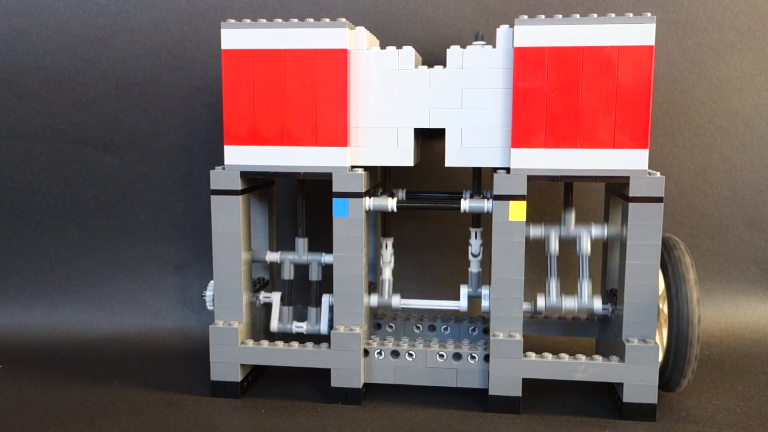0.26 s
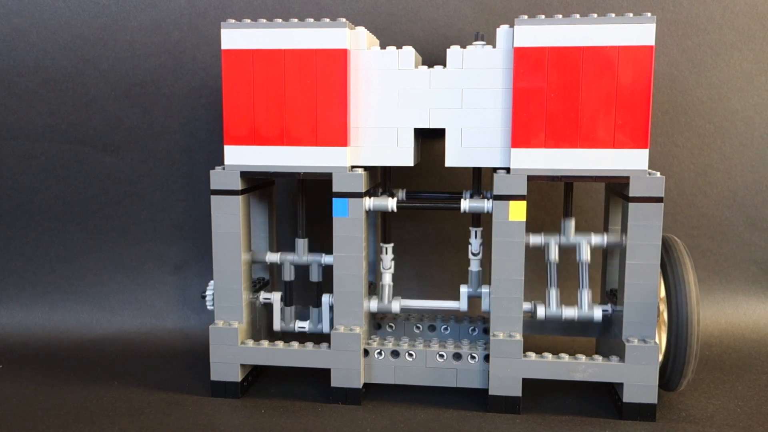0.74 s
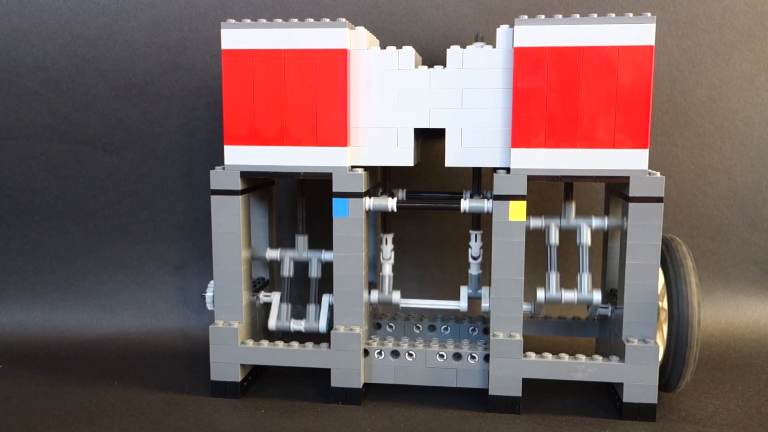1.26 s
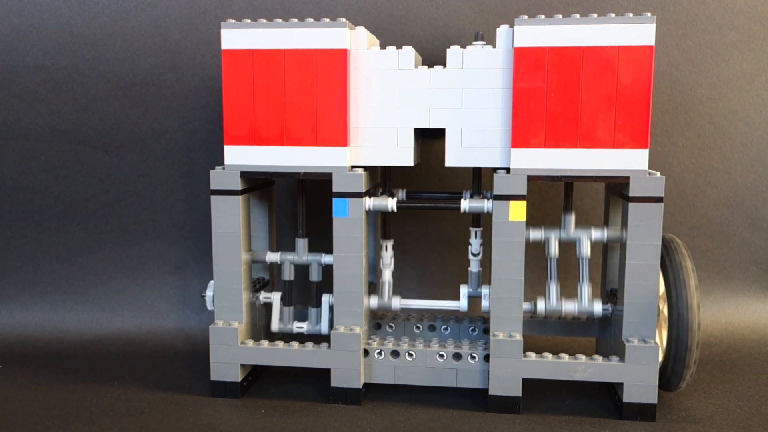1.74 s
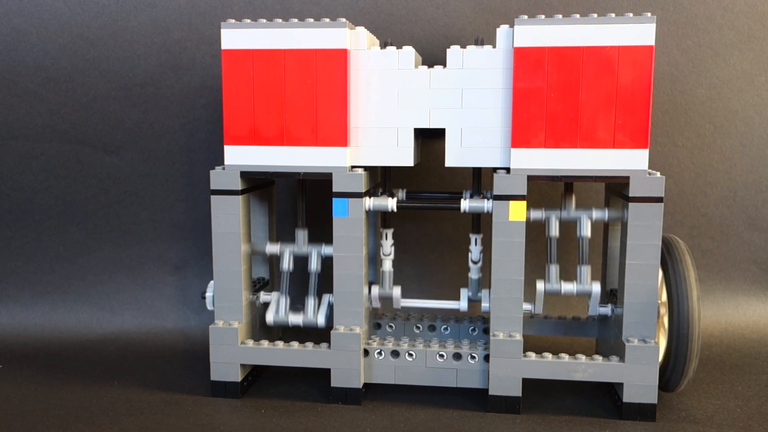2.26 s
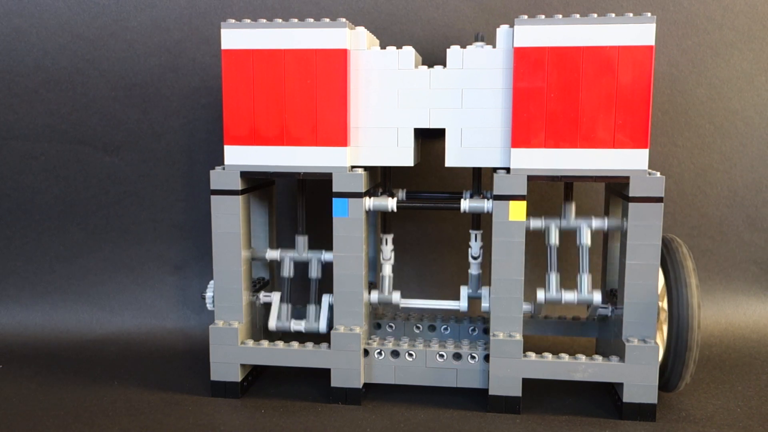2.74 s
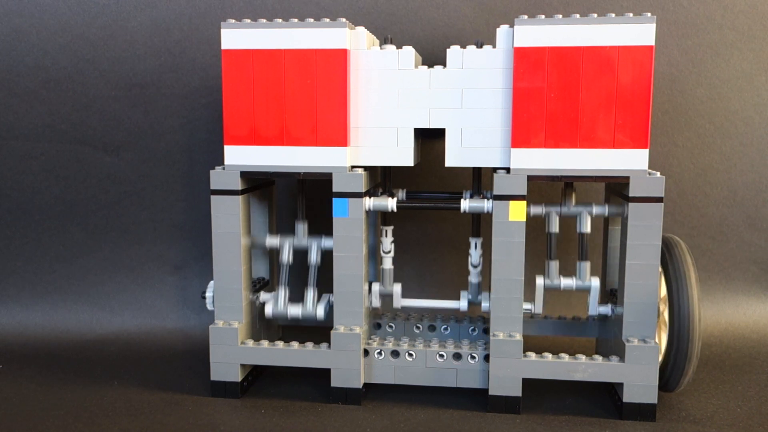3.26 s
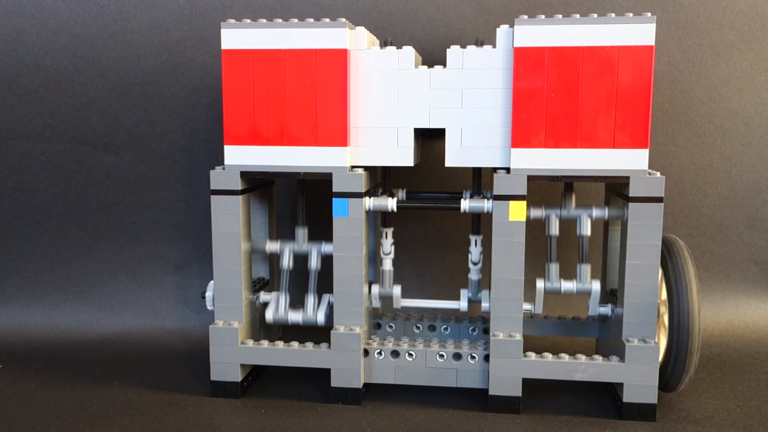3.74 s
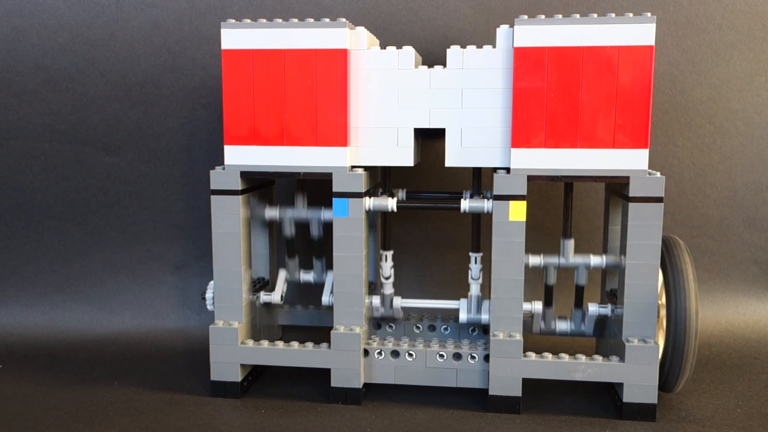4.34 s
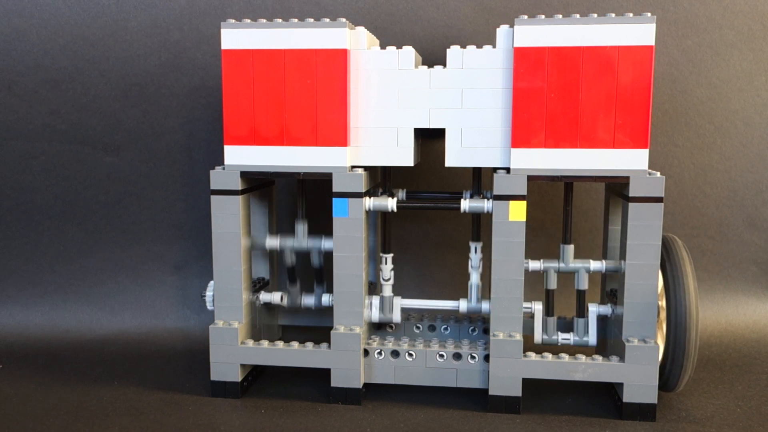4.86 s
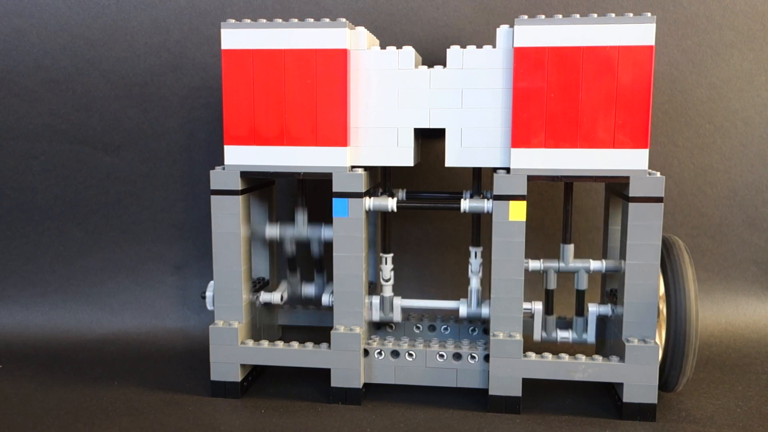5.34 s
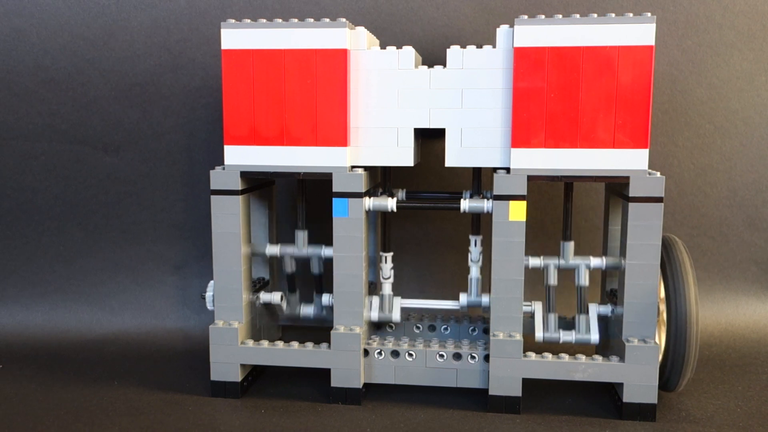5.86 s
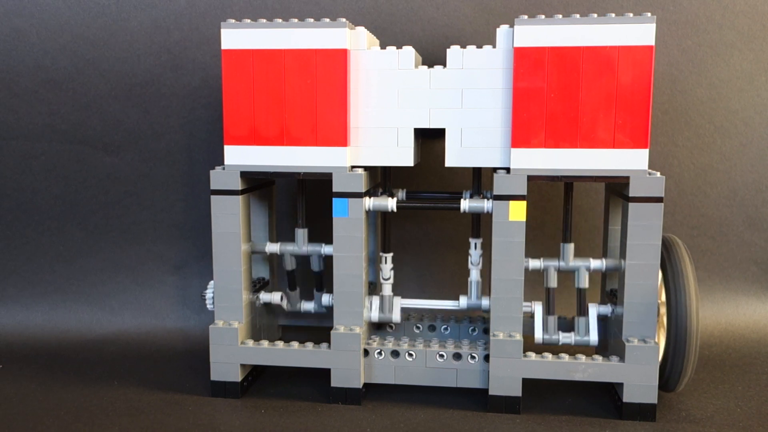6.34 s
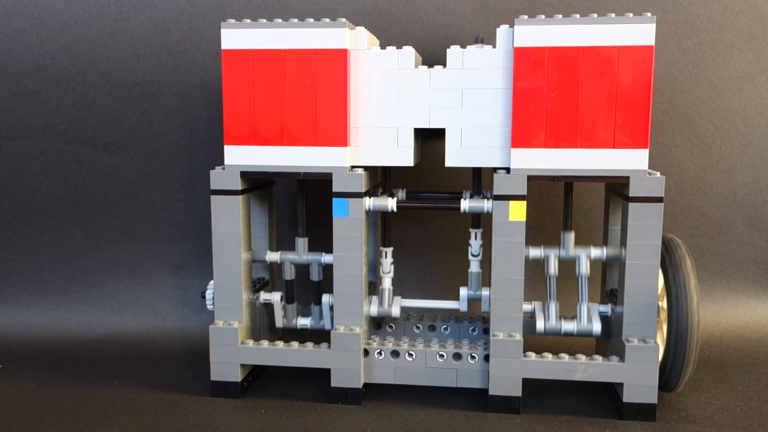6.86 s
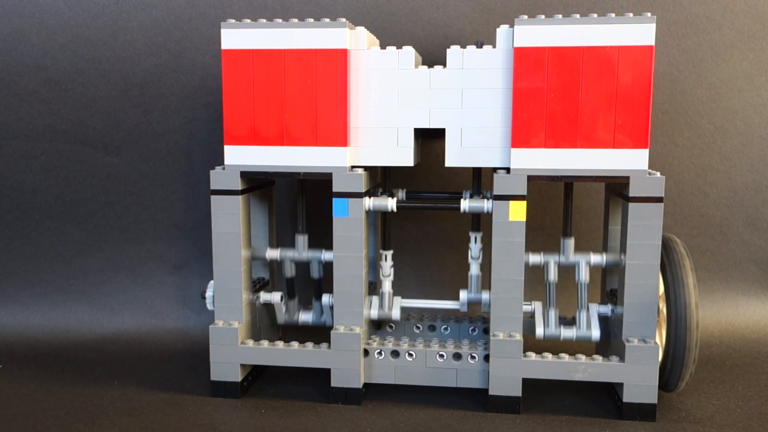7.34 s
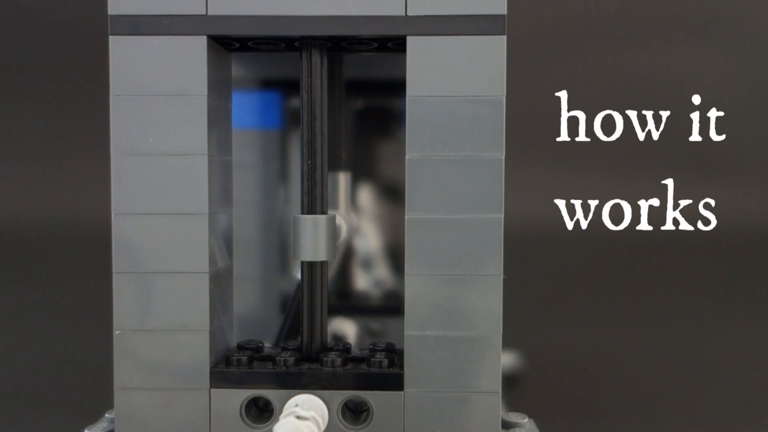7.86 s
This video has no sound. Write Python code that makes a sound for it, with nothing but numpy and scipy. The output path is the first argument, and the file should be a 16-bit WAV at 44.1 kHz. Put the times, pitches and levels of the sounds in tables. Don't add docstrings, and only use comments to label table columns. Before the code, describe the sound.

Close stereo sound of a plastic brick engine in a quiet, dry room: continuous rushing air with a thin whistle near five kilohertz, breathing in quick even pulses. Light hollow plastic knocks, sharp clicks and short rising squeaks repeat every quarter second. The whole machine fades out late, a brief hush follows, and at the very end barely audible scraping and tiny ticks come from slowly turned axles.

```python
import sys
import numpy as np
from scipy import signal
from scipy.fft import rfft, irfft, next_fast_len
from scipy.io import wavfile
from scipy.ndimage import uniform_filter1d

SR = 44100
rng = np.random.default_rng(int(sys.argv[2]) if len(sys.argv) > 2 else 0)


def output_pcm(signal):
    pcm = np.clip(np.atleast_2d(signal).T, -1, 1) * 32767
    wavfile.write(sys.argv[1], SR, np.round(pcm).astype(np.int16))


def rack_gain(trim_db):
    fader = np.asarray(trim_db, float)
    return 10 ** (fader / 20)


N = 357077
SIZE = next_fast_len(N + SR)
HZ = np.arange(SIZE // 2 + 1) * SR / SIZE + 1e-3
ECHO_T60_S, ECHO_DB = .12, -13


def rms_one(x):
    return x / np.sqrt(np.mean(x ** 2) + 1e-20)


def along(rows, x, column=1):
    rows = np.array(rows)
    return np.interp(x, rows[:, 0], rows[:, column])


def at_hz(points):
    hz, db = np.transpose(points)
    return np.interp(np.log(HZ), np.log(hz), db)


def drift(rate):
    r = np.exp(-80 * np.pi * rate / SR)
    slow = signal.lfilter([1], [1, -2 * r, r * r], rng.standard_normal(N // 40 + 2002))[2000:]
    return np.interp(np.arange(N) / 40, np.arange(len(slow)), rms_one(slow))


def ring(clicks, hz, t60):
    r, w = rack_gain(-60 / (t60 * SR)), 2 * np.pi * hz / SR
    return signal.lfilter([0, np.sin(w)], [1, -2 * r * np.cos(w), r * r], clicks + 1e-18)


def arch(share, start, end):
    return np.sin(np.pi * np.clip((share - start) / (end - start), 0, 1))


def high_pass(x, hz):
    return signal.sosfilt(signal.butter(2, hz, "high", fs=SR, output="sos"), x)


# (frequency [Hz], coherence [0-1])
COHERENCE = [(60, 0.92), (130, 0.97), (270, 0.97), (580, 0.93), (1220, 0.87), (2600, 0.9), (5520, 0.83),
             (11700, 0.71)]
# (frequency [Hz], difference [dB])
BALANCE = [(60, 0.0), (110, 0.0), (190, -0.5), (350, -0.5), (630, -1.0), (1120, -2.0), (2020, -2.5),
           (3630, -2.5), (6520, -1.5), (11700, 0.0)]


def pair(mid, side):
    alike, lean = np.clip(at_hz(COHERENCE), 0, 1), rack_gain(at_hz(BALANCE) / 2)
    shared = np.sqrt((1 + alike) / 2) * mid
    apart = np.sqrt((1 - alike) / 2) * side
    return irfft([(shared + apart) * lean, (shared - apart) / lean], SIZE)[:, :N]


def air(spectrum, modes=(), ripple=.25):
    power = rack_gain(2 * at_hz(spectrum))
    for hz, width, db in modes:
        power = power + rack_gain(2 * db) / (1 + (1.3 * (HZ - hz) / width) ** 2) ** 2
    decay = rack_gain(-60 * np.arange(4000) / SR / ECHO_T60_S)
    walls = rfft(rng.standard_normal(4000) * decay, SIZE)
    size = abs(walls)
    power = power * abs(1 + ripple * rms_one(size) * walls / size) ** 2
    mid, side = np.sqrt(power) * rfft(rng.standard_normal((2, SIZE)))
    return rms_one(pair(mid, side))


def whistle(hz, width_hz, apart, tone):
    r = np.exp(-np.pi * width_hz / SR)
    slow = rms_one(signal.lfilter([1], [1, -r], rng.standard_normal((2, 2, N))))
    angle = 2 * np.pi * np.cumsum(hz + .3 * width_hz * drift(50.5)) / SR
    mid, side = slow[0] * np.cos(angle) + slow[1] * np.sin(angle)
    mid = mid + tone * np.cos(angle)
    return rms_one(np.array([mid + apart * side, mid - apart * side]))


def nearby(x):
    t = np.arange(SR // 4) / SR
    tails = rng.standard_normal((2, len(t))) * rack_gain(-60 * t / ECHO_T60_S) * (t > .002)
    echo, apart = rfft(tails / np.sqrt(np.sum(tails[0] ** 2)), SIZE)
    source = rfft(x, SIZE)
    return pair(source * (1 + rack_gain(ECHO_DB) * echo), source * apart)


# (time [s], turns made [count])
CRANK = [(-0.044, 0), (0.953, 4), (2.929, 12), (4.396, 18), (5.624, 23), (6.845, 28), (8.325, 34)]
SPREAD_DB = [
    0,
    1.2,
    1.1,
    1,
    1.3,
    2,
]
# (time [s], first squeak [dB], second squeak [dB])
DRYNESS = [(0, -1.5, 1), (1.5, -.5, 1), (2.7, -.5, -2), (3.5, 0, 2.5), (5.8, 1.5, 0), (6.7, 1, -4),
           (7.4, -2, -3)]


def strengths():
    s, turns = np.transpose(CRANK)
    starts = np.interp(np.arange(turns[-1] + 1), turns, s)
    db = rng.standard_normal((len(starts), len(SPREAD_DB))) * SPREAD_DB
    db[:, 2:4] += along(DRYNESS, starts)[:, None]
    db[:, 5] += along(DRYNESS, starts, column=2)
    return starts, db


def valve(share):
    opens, widest, shuts = .63, .88, 1.6
    place = (share - opens) % 1 + opens
    return np.sin(np.pi / 2 * np.interp(place, [opens, widest, shuts], [0, 1, 0])) ** 2


# (frequency [Hz], density [dB per Hz])
LEAK = [(24, -82.5), (40, -43), (140, -31.5), (220, -11.5), (370, -34.5), (600, -13), (1800, -10.5),
        (2800, -4.5), (3250, -11.5), (4900, -1), (6070, -15), (9100, -19.5), (10300, -12), (11060, -11.5)]
# (frequency [Hz], width [Hz], level [dB])
LEAK_MODES = [(113, 15, -23.5), (215, 33, -18.5), (278, 44, -10), (321, 30, -8), (402, 34, -11),
              (451.4, 30, -3.5), (527, 33, -5.5), (785, 80, -6.5), (1067, 23, -23.5), (1126, 28, -5.5),
              (1510, 35, -6.5), (1690, 38, -20), (1900, 29, -28.5), (2936, 300, -7), (4200, 110, -8),
              (5230, 220, -28), (8450, 390, -13.5), (9930, 250, -11), (10020, 200, -40), (11020, 430, -4)]
# (frequency [Hz], width [Hz], level [dB])
MOTOR = [(99, 8, -32), (118, 8, -26), (160, 8, -24.5), (180, 9, -16.5)]


def leak():
    return rack_gain(-21.5 + 0.35 * drift(8)) * air(LEAK, LEAK_MODES + MOTOR)


# (frequency [Hz], density [dB per Hz])
RUSH = [(300, -55.5), (900, -30), (1500, -14.5), (2300, -6.5), (3250, -14), (4400, -3.5), (5500, -10),
        (6100, -18.5), (7300, -13), (8500, -22.5), (9100, -20), (11060, -15.5)]
# (frequency [Hz], width [Hz], level [dB])
RUSH_MODES = [(2020, 190, -6.5), (2826, 206, -1), (3593, 200, -3), (4250, 320, -10.5), (6700, 230, -17),
              (8080, 700, -15), (9630, 130, -12.5)]


def rush(opening):
    shut_db = -9
    level_db = -19.5 + shut_db * (1 - opening) + 1.1 * drift(25)
    return rack_gain(level_db) * air(RUSH, RUSH_MODES)


# (frequency [Hz], density [dB per Hz])
HOSE = [(40, -44), (140, -20.5), (230, -7), (700, -3), (1300, -1.5), (2000, -11.5), (4000, -43.5)]
# (start [share of turn], end [share of turn], level [dB])
CHOKE = (0.48, 0.742, -13.5)


def hose_roar(share):
    start, end, choke_db = CHOKE
    level_db = -33.5 + choke_db * arch(share, start, end) + 1.0 * drift(15)
    return rack_gain(level_db) * air(HOSE)


def port_whistle(share, opening):
    hz = 5220 - 115 * opening
    tone = whistle(hz, width_hz=175, apart=.35, tone=0.85) * rack_gain([[-.8], [.8]])
    level_db = -23 - 1.5 * opening - 2 * arch(share, .78, 1.0)
    return rack_gain(level_db + .8 * drift(15)) * tone


# (start [share of turn], end [share of turn], frequency [Hz], width [Hz], level [dB])
EDGE = (.8, 1.1, 7780, 200, -32.5)


def edge_tone(share):
    start, end, hz, width_hz, db = EDGE
    swell = arch((share - start) % 1, 0, end - start)
    return rack_gain(db + 1.5 * drift(5)) * swell * whistle(hz, width_hz, apart=.35, tone=0)


# (place [share of turn], timing spread [s], SPREAD_DB column [index])
BLOWS = [
    (.09, .002, 1),
    (.315, .002, 0),
    (.382, .0015, 0),
    (.432, .002, 0),
    (.543, .0005, 4),
]
# (frequency [Hz], peak level [dB], t60 [s])
FRAME = [
    [(2100, -28, .05), (2300, -21, .045), (2480, -21, .06), (2950, -22, .025), (3300, -24, .012),
     (1500, -31, .04)],
    [(530, -31, .08), (1200, -29, .04), (2900, -27, .03)],
    [(2190, -23.5, .06), (2850, -25, .06), (550, -32, .08)],
    [(6100, -27, .025), (3850, -28, .03), (8000, -33, .01)],
    [(2500, -21, .09), (2900, -22, .025), (2050, -27, .03), (3300, -25, .012), (4850, -23, .02)],
]


def blows(starts, part_db):
    out, lengths = np.zeros(N + SR), np.diff(starts)
    for (share, spread, column), modes in zip(BLOWS, FRAME):
        seconds = starts[:-1] + share * lengths + spread * rng.standard_normal(len(lengths))
        at = (seconds * SR).astype(int)
        heard = at > 0
        for hz, db, t60 in modes:
            clicks = np.zeros(N + SR)
            level_db = db + part_db[:-1, column] + 1.5 * rng.standard_normal(len(at))
            clicks[at[heard]] = rack_gain(level_db)[heard]
            out += ring(clicks, hz, t60)
    return high_pass(out[:N], 400)


# (start [share of turn], end [share of turn], from [Hz], to [Hz], level [dB],
# SPREAD_DB column [index])
SQUEAKS = [
    (.445, .545, 1175, 1295, -28, 2),
    (.435, .505, 2410, 2570, -21, 3),
    (.49, .54, 2570, 2570, -28, 3),
    (.84, .91, 2870, 2780, -24, 5),
    (.77, .83, 2900, 2860, -27, 5),
]


def squeaks(part_db, share):
    out = 0
    for start, end, from_hz, to_hz, db, column in SQUEAKS:
        hz = np.interp(share, [start, end], [from_hz, to_hz]) * (1 + .014 * drift(60))
        level_db = db + part_db[:, column] + 2.5 * drift(60)
        out = out + rack_gain(level_db) * arch(share, start, end) * np.sin(2 * np.pi * np.cumsum(hz) / SR)
    return out


def engine(t):
    starts, part_db = strengths()
    crank = np.interp(t, starts, np.arange(len(starts)))
    turn, share = crank.astype(int), crank % 1
    opening = valve(share)
    flow = leak() + rush(opening) + hose_roar(share)
    tones = port_whistle(share, opening) + edge_tone(share)
    linkage = blows(starts, part_db) + squeaks(part_db[turn], share)
    return flow + tones + nearby(linkage)


# (time [s], level [dB])
QUIET = [(0, -120), (7.6, -99), (7.7, -88), (7.88, -79), (8.1, -82)]
# (frequency [Hz], density [dB per Hz])
ROOM = [(24, -50), (40, -20), (162, -18), (260, 1), (362, -10), (1100, -12), (11500, -17), (15000, -47),
        (22000, -120)]


def quiet_room(t):
    return rack_gain(along(QUIET, t)) * air(ROOM)


# (frequency [Hz], density [dB per Hz])
RUB_COLOUR = [(60, -48), (100, -20), (650, -7), (2300, -7), (4800, -12), (7300, -12), (10500, -17),
              (11060, -19)]
# (frequency [Hz], width [Hz], level [dB])
RUB_MODES = [(845, 98, -6), (1230, 75, 0), (2270, 300, 0), (3310, 210, -5), (5520, 41, -5),
             (6460, 150, -11), (7270, 48, -5), (9880, 40, -15)]
# (frequency [Hz], width [Hz], level [dB])
AXLE_WHINE = (7330, 160, -3)


def axle_rub(t):
    start_s, attack_s = 7.888, .007
    pull_s, pull_peak_s = .17, 7.93
    pull_db = -62.5 + 3 * np.cos(2 * np.pi * (t - pull_peak_s) / pull_s)
    grip = np.clip((t - start_s) / attack_s, 0, 1) ** 2
    return grip * rack_gain(pull_db + 2.5 * drift(150)) * air(RUB_COLOUR, RUB_MODES + [AXLE_WHINE])


# (time [s], peak level [dB], main ring [Hz])
TICKS = [(7.894, -50, 2080), (7.905, -53, 3400), (7.921, -49, 7280), (7.93, -47, 5450), (7.933, -48, 2210),
         (7.96, -56, 2300), (7.974, -54, 1280), (7.986, -52, 7280), (8.007, -45, 2260), (8.023, -54, 2110),
         (8.038, -50, 2100), (8.045, -53, 1260), (8.056, -50, 3340), (8.078, -52, 1220), (8.09, -47, 7300)]


def crank_ticks():
    ticks, start = np.zeros(N), round(7.8 * SR)
    after = np.arange(N - start) / SR
    for s, db, hz in TICKS:
        since = np.maximum(after + start / SR - s - .001, 0) * hz / 1.3
        scrape = since * np.exp(-since) * rng.standard_normal(len(after))
        main = ring(scrape, hz, 37.0 / hz + 0.0066)
        body = sum(rack_gain(mode_db) * ring(scrape, mode_hz, .004) for mode_hz, _, mode_db in RUB_MODES)
        ticks[start:] += rack_gain(db) * (.9 * main / abs(main).max() + .75 * body / abs(body).max())
    return nearby(high_pass(ticks, 600))


def scene():
    t = np.arange(N) / SR
    fade_start_s, fade_end_s = 6.654, 7.723
    remaining = np.clip((fade_end_s - t) / (fade_end_s - fade_start_s), 0, 1)
    fade = np.sin(np.pi / 2 * remaining) ** 2.11
    return fade * engine(t) + quiet_room(t) + axle_rub(t) + crank_ticks()


def low_pass(x):
    return signal.sosfilt(signal.butter(12, 12320, fs=SR, output="sos"), x)


def record(dry):
    cutoff_hz, fringe_hz, fringe_db = 11020, 11270, -19.5
    spectrum = rfft(high_pass(dry, 116), SIZE)
    below, fringe_below = (1 / (1 + np.exp(np.clip((HZ - hz) / 12, -50, 50))) for hz in (cutoff_hz, fringe_hz))
    body = irfft(spectrum * below, SIZE)[:, :N]
    fringe = irfft(spectrum * (fringe_below - below), SIZE)[:, :N]
    opened = uniform_filter1d(1. * (drift(20) > -.3), size=1024)
    mix = body + rack_gain(fringe_db) * opened * fringe
    return low_pass(mix)


dry = scene()
out = record(dry)
output_pcm(out)
```